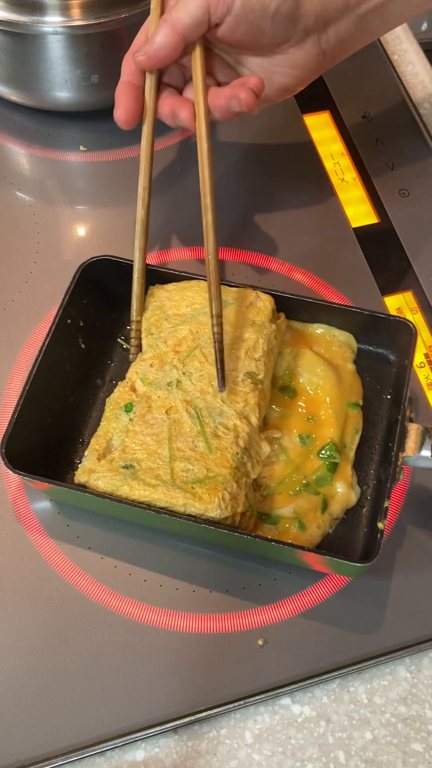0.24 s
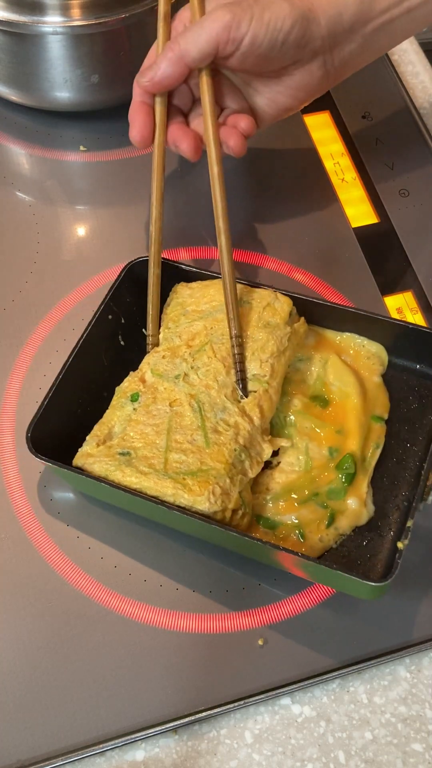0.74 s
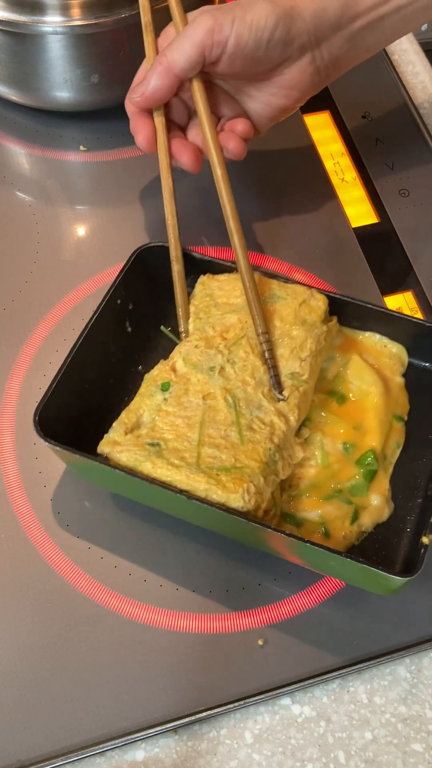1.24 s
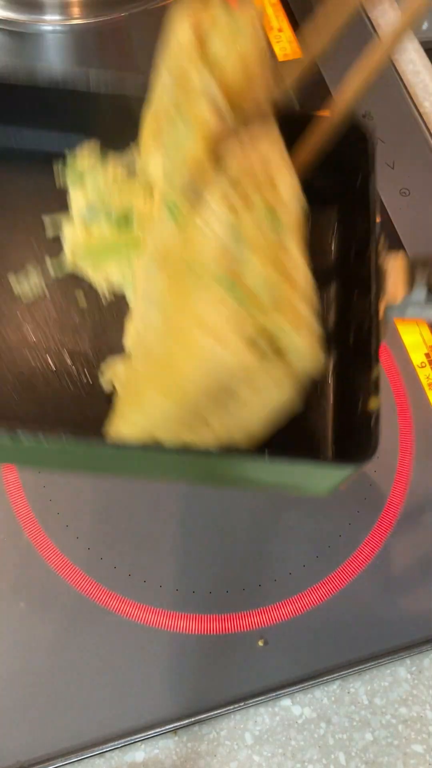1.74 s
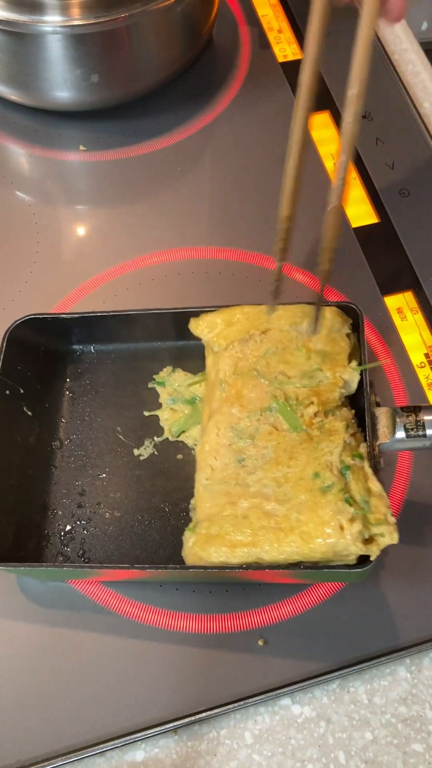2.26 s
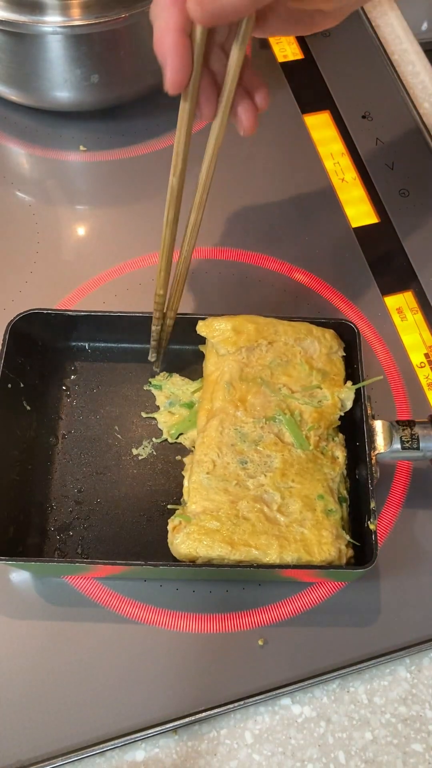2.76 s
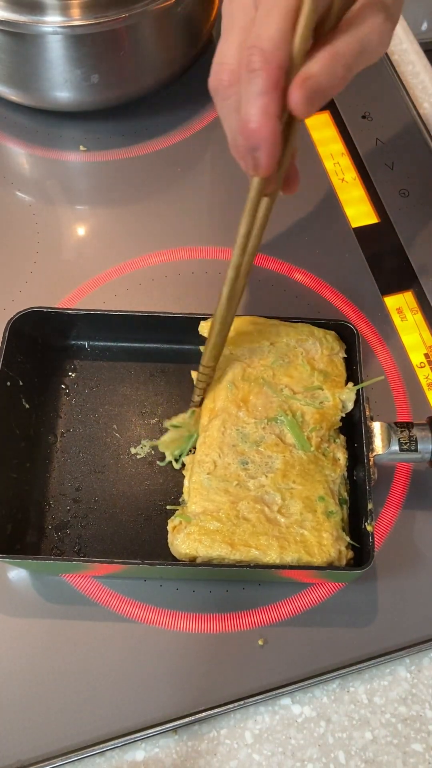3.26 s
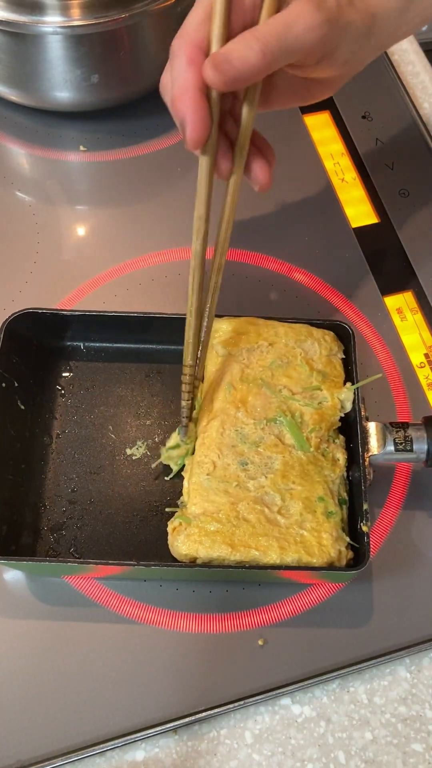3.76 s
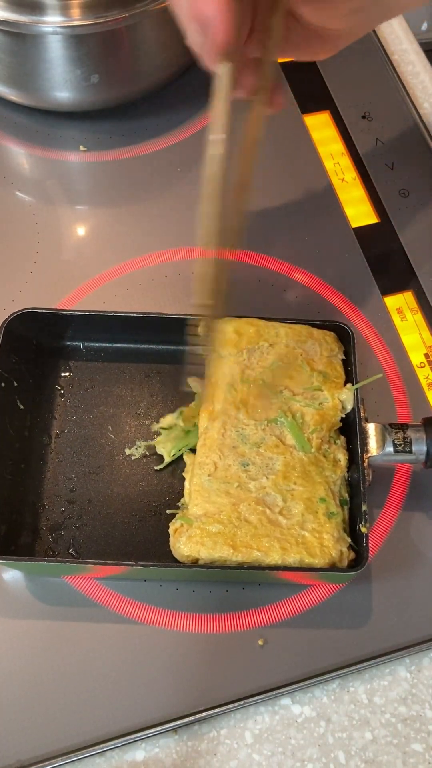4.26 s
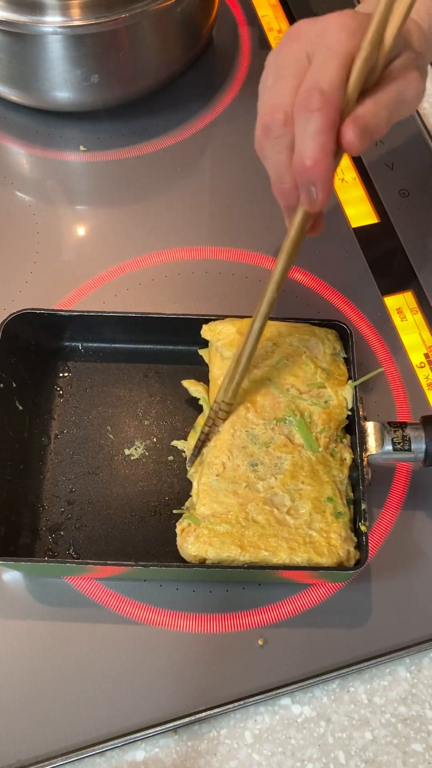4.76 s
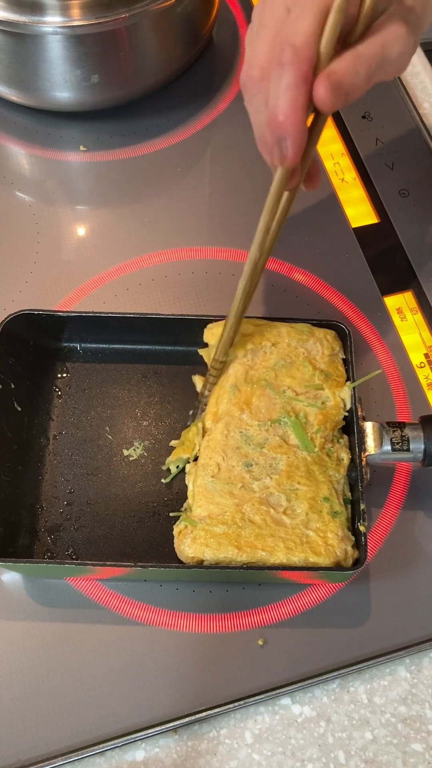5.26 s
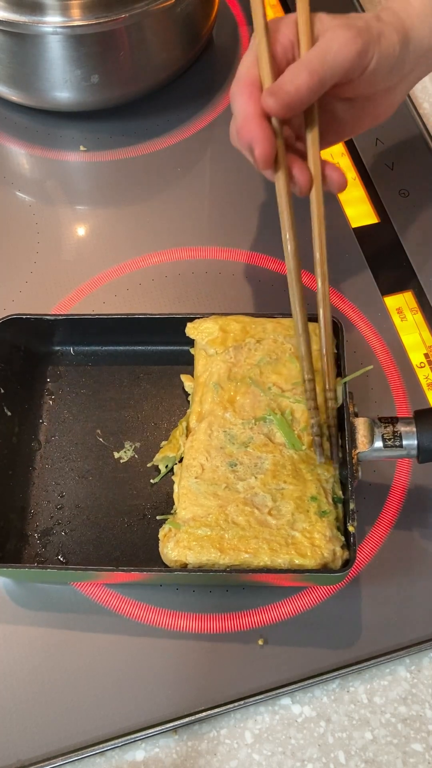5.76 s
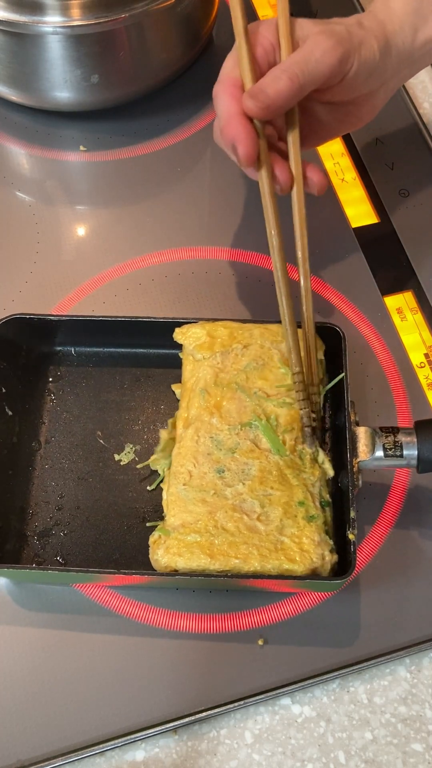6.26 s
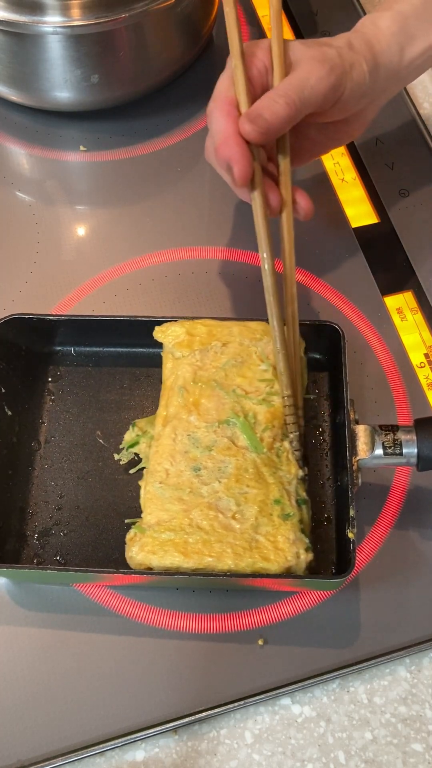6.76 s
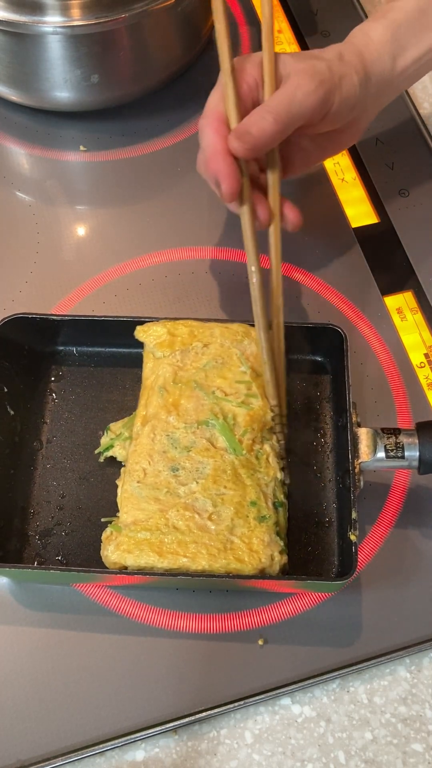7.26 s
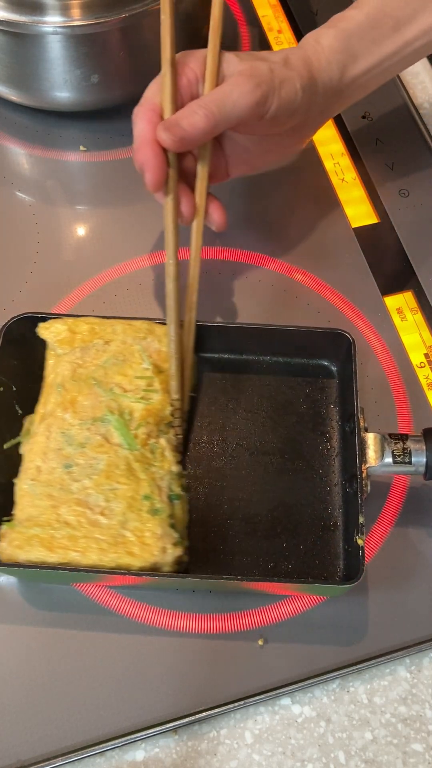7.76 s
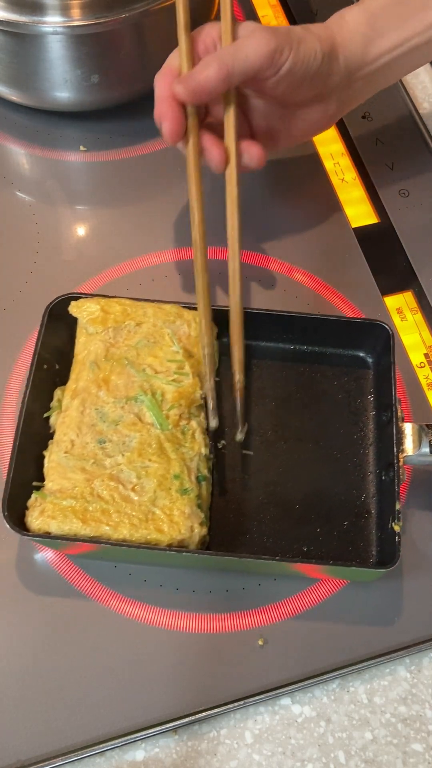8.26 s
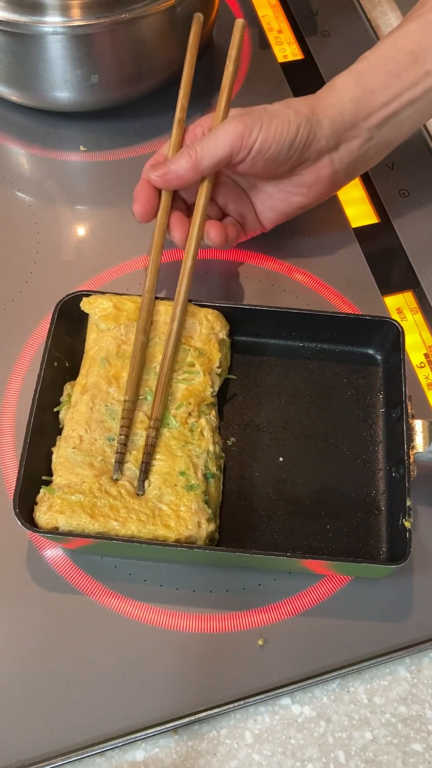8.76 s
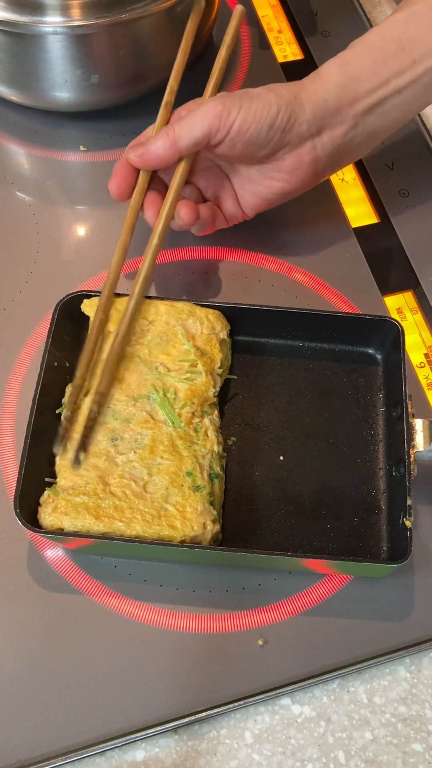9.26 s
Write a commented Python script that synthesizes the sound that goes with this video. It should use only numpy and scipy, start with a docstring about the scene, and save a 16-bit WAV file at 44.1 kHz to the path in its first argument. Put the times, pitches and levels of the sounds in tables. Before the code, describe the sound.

An omelette is rolled on a glass-topped hob, heard from close above in stereo. A steady low fan drone underlies thin frying fizz. Two light knocks come first, then a rustle and one hard clack as the pan is set down, followed by little settling bumps. After a quieter spell, small bamboo taps and sharp spits gather into a scratchy, crackling push, then ease off.

```python
"""In a kitchen, an omelette is rolled with chopsticks in a square pan on a glass-topped induction hob.
Random noise shaped by resonances makes the fan's drone; wavering sine tones make the coil's hum and whines.
Clouds of tiny clicks make the sizzle, and short cracks with pings make the spits of fat and steam.
The pan is tilted, swung up to flip the roll and set down with a clack of fading tones;
then chopsticks push the roll over the hot metal, heard as jerky clicks, crackles and wooden taps."""
import sys
import numpy as np
from scipy import signal
from scipy.fft import rfft, irfft
from scipy.io import wavfile

SR = 44100
rng = np.random.default_rng(int(sys.argv[2]) if len(sys.argv) > 2 else 0)


def master(y):
    """Save y as 16-bit WAV."""
    cut = np.clip(np.atleast_2d(y).T, -1, 1)
    pcm = np.round(cut * 32767)  # scale
    wavfile.write(sys.argv[1], SR, pcm.astype(np.int16))


N = 419391

# air resonances of the hob housing: (centre [Hz], width of one filter pass [Hz], relative level [dB])
HOUSING_RESONANCES = [(71, 29, -14.5), (98.8, 23.7, -3), (117.5, 20.4, -1.5), (133.8, 25.3, -1.5),
                      (167, 36, -17.5), (220.7, 25.5, -10), (244.5, 20.6, -11), (334, 25, -10),
                      (361, 30.6, -12), (430.8, 49, -13), (500, 25, -19), (715, 126, -21.5),
                      (1047, 75, -23.5)]
# colour of the fan's rushing air: (frequency [Hz], relative level per Hz [dB])
AIR_COLOUR = [(20, -10), (150, 8.5), (320, 7.5), (560, 3.5), (900, 2.5), (1400, -2.5), (2200, -2.5),
              (2700, -7.5), (3300, -7), (5000, -28), (16000, -64)]
# loudness of the fan's boom before its random waver: (time [s], level [dB])
DRONE_LEVEL = [(0, -39.5), (1.7, -37), (2.6, -37.5), (3.15, -39.5), (3.75, -37.5), (4.2, -36), (5.5, -36.5),
               (6.1, -37.5), (6.8, -37.5), (8.3, -38), (9.51, -38.5)]
# the fan at the two microphone openings: (frequency [Hz], left minus right [dB], likeness [0-1])
FAN_IMAGE = [(30, 1, 0.9), (70, 2.5, 1), (130, 1.4, 0.99), (235, -0.5, 0.98), (373, 5, 0.98),
             (527, 3.5, 0.54), (720, 3.5, 0.37), (900, 0.5, 0.21), (2200, -3, 0.21), (16000, -13, 0.2)]
# step between the two microphone openings: (frequency [Hz], lead of the left [radians])
PORT_PHASE = [(0, 0), (450, -.1), (1000, -.8), (2150, .8), (3300, .2), (4500, 2.15), (16000, 13.75)]
# whines of the coil: (pitch [Hz], level between the fades [dB], start [s], end [s])
COIL_WHINES = [(2041, -65.5, 4.4, 8.6), (2190, -65.5, 7.2, 9.2)]
# pan raised off the glass: (time [s], length [s], level of the air ringing in the gap [dB])
PAN_LIFTS = [(.3, 0.72, -55.5), (1.597, 0.31, -47)]
# short or longer soft rustles with a flare of frying; the one at 2.165 s swells just before the clack:
# (time [s], length [s], rustle level [dB], relative flare of the frying [dB], rustle centre [Hz])
RUSTLES = [(0.636, 0.1, -55, -42.5, 2000), (1.01, 0.13, -67, -47, 1600), (1.726, 0.17, -54, -45.5, 1600),
           (2.165, 0.045, -33, -41, 1300), (2.413, 1, -52, -73, 2400)]
# ringing tones of the pan on the glass: (pitch [Hz], relative level [dB], free time to fall 60 dB [s])
PAN_MODES = [(131, -12.5, 0.15), (330, -13, 0.045), (437, -6.5, 0.028), (610, -10, 0.024),
             (850, -12, 0.032), (1038, -12.5, 0.05), (1144, -15, 0.07), (1250, 0.5, 0.028),
             (1357, -10, 0.059), (1700, -1.5, 0.02), (1795, 0.5, 0.025), (2370, -4, 0.029),
             (2540, -5, 0.02), (2880, -9.5, 0.05), (3150, -5, 0.021), (3470, -1.5, 0.016),
             (4446, -1, 0.021), (5280, -4.5, 0.011), (6720, -8, .012), (8100, -4.5, 0.0088)]
# knocks of the pan on the glass:
# (time [s], peak level [dB], softness: treble cut-off [Hz], thinness: bass cut-off [Hz],
#  share of the free ring time [ratio], pitch favoured by the struck spot [Hz], size of that favour [dB])
PAN_KNOCKS = [(.7172, -15, 4200, 300, 0.76, 1320, 4), (.7195, -23.5, 700, 200, .7, 420, 4),
              (1.155, -24.5, 5000, 1000, 1.6, 1760, -1), (1.6287, -31, 6000, 800, 0.87, 850, 1),
              (2.1989, 1, 13000, 600, 0.76, 1754, 5), (2.2032, -12, 600, 100, 0.65, 303, 4),
              (2.2216, -4.5, 1900, 500, 0.29, 1170, 7), (2.2256, -15, 450, 110, 0.73, 330, 8),
              (2.4378, -20, 1400, 300, .8, 1030, 11), (2.4422, -20.5, 600, 150, 0.75, 340, 2),
              (2.7227, -20, 2900, 950, 1, 1270, 7), (2.817, -33.5, 2200, 900, 0.67, 1270, 8)]
# ringing tones of bamboo chopsticks: (pitch [Hz], relative level [dB], free time to fall 60 dB [s])
BAMBOO_MODES = [(1400, -10, 0.042), (1619, -7, 0.055), (1890, -6.5, 0.022), (2504, -4, 0.025),
                (3294, -6, 0.025), (3640, -6.5, 0.021), (4300, -7.5, 0.019)]
# chopstick taps:
# (time [s], peak level [dB], softness: treble cut-off [Hz], thinness: bass cut-off [Hz],
#  share of the free ring time [ratio], pitch favoured by the struck spot [Hz], size of that favour [dB])
CHOPSTICK_TAPS = [(3.591, -33, 1900, 800, 0.8, 1500, 4), (4.39, -26, 4000, 800, 0.98, 1630, 4),
                  (4.3935, -28.5, 4500, 1300, 1.3, 2600, 4), (5.0147, -25, 3600, 1200, 0.75, 1630, 5),
                  (5.2167, -26, 9000, 2800, 0.6, 3600, 5), (5.241, -34, 2200, 900, 0.89, 1500, 4),
                  (5.338, -32.5, 6000, 3000, 0.83, 3700, 8), (5.609, -33, 8000, 3200, .6, 4200, 6),
                  (5.849, -32, 4000, 1500, .7, 2290, -1), (6.02, -29.5, 2500, 900, 1.7, 1470, 9),
                  (6.274, -33, 2000, 700, 1, 1400, 4), (6.954, -25.5, 6020, 1700, 0.38, 2430, 5),
                  (6.974, -27, 5000, 1500, 0.46, 2390, 9), (7.0073, -28.5, 4490, 1700, .51, 2450, 5),
                  (7.333, -26, 6000, 2600, 1.4, 3890, 4), (7.4265, -22.5, 4500, 1900, 0.45, 2350, 4),
                  (7.464, -28, 6000, 2200, .6, 3390, 7), (7.518, -26, 4500, 1600, .7, 2140, 2),
                  (7.65, -33, 4000, 1800, .7, 2400, 5), (7.6755, -31, 4500, 1700, 0.52, 2230, 5),
                  (7.7695, -23.5, 6000, 2400, .7, 3500, 8), (8.475, -27, 7000, 2396, .86, 3350, 3)]
# chopsticks push the roll: (time [s], length [s], relative force before the build-up is applied [dB])
PUSHES = [(5.72, 0.46, -59), (6.178, 0.31, -58), (6.564, 0.57, -48), (7.209, 0.53, -43),
          (8.423, 0.089, -53)]
# colour of wet egg rubbing over the pan: (frequency [Hz], relative level per Hz [dB])
RUB_COLOUR = [(400, -22), (1200, -8), (1600, -3), (1900, -11), (2150, 15), (2800, 6), (3600, -1),
              (4400, -7), (5400, -12), (6600, 6), (9000, 7), (16000, -8)]
# colour of the frying egg: (frequency [Hz], relative level per Hz [dB])
FRY_COLOUR = [(300, -47), (1200, 2), (2200, -1), (3600, -3), (5400, 2.5), (7000, 0), (9000, 1.5),
              (11500, -1), (14000, 1), (16000, -4.5)]
# single spits of fat and bursting steam blisters:
# (time [s], relative strength [dB], centre [Hz], droplets against the crack [dB])
SPITS = [(.046, -20.5, 10500, -24), (.283, -39, 9000, -22), (.484, -37, 9000, -22),
         (0.586, -24, 15000, -24), (0.749, -19, 7380, -22), (0.7976, -26, 9020, -22),
         (1.254, -28, 8050, -22), (1.715, -15, 9900, -8), (1.7998, -23, 8870, -20), (2.356, -23, 8320, -10),
         (2.813, -19.5, 8610, -18), (2.8589, -22, 9070, -14), (3.2665, -23, 8760, -20),
         (3.8174, -24, 9100, -20), (3.906, -22.5, 9820, -20), (4.119, -19, 9130, -9),
         (4.5935, -20, 9030, -7), (4.9386, -25, 14600, -22), (4.996, -27, 9500, -24),
         (5.2164, -8, 11500, -28), (5.231, -14.5, 9000, -12), (5.2484, -26, 8600, -24),
         (5.3385, -20, 9630, -14), (5.6082, -20, 8700, -20), (5.7713, -27, 14300, -22),
         (5.8311, -16, 14200, -17), (5.9469, -26, 14400, -20), (5.9805, -12, 10000, -13),
         (6.0172, -8, 13600, -12), (6.432, -25, 14000, -22), (6.475, -23, 9000, -22),
         (6.5181, -18, 9470, -22), (6.618, -17, 13800, -22), (6.8388, -20, 9080, -14),
         (6.9553, -5, 10900, -14), (6.9747, -14, 9400, -20), (6.9799, -12.5, 9200, -18),
         (7.008, -15, 9200, -22), (7.086, -12, 15000, -14), (7.1084, -18, 14400, -20),
         (7.1302, -13, 9460, -10), (7.245, -13.5, 9190, -7), (7.262, -14, 7530, -24),
         (7.3115, -13, 13400, -22), (7.334, -17, 14300, -18), (7.3419, -17, 9400, -16),
         (7.464, -15.5, 8420, -10), (7.514, -15, 10000, -17), (7.528, -12, 9100, -20),
         (7.6402, -9, 12500, -22), (7.659, -23, 9070, -18), (7.7, -14, 9770, -16), (7.777, -14, 8660, -14),
         (7.937, -16, 10300, -6), (7.961, -13, 8860, -7), (8.092, -32, 9000, -20),
         (8.1341, -16.5, 9100, -10), (8.353, -25, 9000, -20), (8.389, -19, 8950, -10),
         (8.455, -19, 9000, -16), (8.489, -18, 9600, -12), (8.80, -18, 8840, -26),
         (8.8133, -20, 13800, -26), (9.152, -24, 8800, -22), (8.4404, -23, 8730, -16),
         (8.4755, -15, 10000, -22), (8.5905, -13, 8750, -6), (8.7336, -22, 8240, -18),
         (8.8103, -8, 14600, -28), (8.9677, -20.5, 10200, -15), (9.259, -12.5, 12500, -20),
         (9.424, -19, 8550, -10)]
# wet egg pressed on to hot metal: (time [s], length [s], relative level [dB])
SQUEEZES = [(5.858, 0.037, -40), (6.017, 0.018, -25.5), (6.042, 0.013, -27), (6.834, 0.015, -34.5),
            (7.335, .012, -28), (7.516, 0.01, -31.5), (7.55, 0.0055, -30), (7.573, 0.018, -39),
            (7.646, 0.013, -40)]

TOP_HZ = 15800  # nearly nothing is heard above this
TIME = np.arange(N) / SR  # seconds
HZ = np.maximum(np.fft.rfftfreq(N, 1 / SR), 1)  # frequencies, kept above zero for the logarithm
HUM_HZ, HUM_DB = 118.4, -50.5  # low hum of the coil
LIFT_ATTACK_S, LIFT_RELEASE_S = 0.12, 1
RUSTLE_ATTACK_S, RUSTLE_RELEASE_S = 0.033, 0.29
SPOT_WIDTH_HZ = 150  # how widely the struck spot favours the tones around its pitch
IN_STEP_HZ = 1500  # tones up to here all start in the same direction
# chatter of touching surfaces, against the ringing tones
PAN_CHATTER_DB, BAMBOO_CHATTER_DB, CHATTER_T60_S = -6, -3, 0.055
PUSH_ATTACK_S, PUSH_RELEASE_S, PUSH_BUILD_DB = 0.12, 0.38, 2.5  # each push gathers force as it goes
# frying flares with a push, but grows more slowly than its force
PUSH_FRY_DB, PUSH_FRY_POWER = -19.5, 0.48
# the egg fries quietly until the tilt lets it run over bare metal, then steadily (relative levels)
WET_S, QUIET_FRY_DB, STEADY_FRY_DB = 0.65, -53, -47.5
# lesser spits at random: average rate, relative strength and its scatter, centre, droplets against crack
SPITS_PER_S, SMALL_SPIT_DB, SMALL_SPIT_SCATTER_DB = 9, -33, 5.5
SMALL_SPIT_HZ, SMALL_DROPLETS_DB = 9200, -13
CRACK_T60_S, DROPLETS_T60_S, PING_T60_S = 0.003, 0.044, 0.0015  # times to fall 60 dB


def undb(db):
    """Turn decibels into a plain multiplier."""
    return 10 ** (np.asarray(db) / 20)


def level(x, db):
    """Set the average (rms) level."""
    return x * undb(db) / np.sqrt(np.mean(x ** 2))


def across(rows, axis=1):
    """Read one column of a table at every frequency."""
    rows = np.array(rows)
    return np.interp(np.log(HZ), np.log(rows[:, 0]), rows[:, axis])


def filtered(x, response):
    """Make each frequency stronger or weaker, as the response says."""
    return irfft(rfft(x) * response, N)


def resonance(hz, width_hz):
    """Response of one resonance, 1 at its centre."""
    return 1 / (1 + 1j * hz / width_hz * (HZ / hz - hz / HZ))


def walk(rate):
    """Wander at random between points, rate of them per second, with a spread near 1."""
    knots = np.arange(0, TIME[-1] + 1, 1 / rate)
    return 1.182 * np.interp(TIME, knots, rng.standard_normal(len(knots)))


def grains(rate, spread_db):
    """Tiny random clicks, rate per second; a wider spread makes a few stand out; rms 1."""
    happens = rng.random(N) < rate / SR
    size = np.minimum(rng.exponential(size=N), 4.8)
    direction = rng.choice([-1, 1], N)
    return level(happens * undb(spread_db * size) * direction, 0)


def ports(direct, diffuse, likeness, pan_db):
    """Direct sound reaches the two microphone openings out of step; diffuse sound differs at each."""
    side = np.array([[.5], [-.5]])
    share = np.clip(likeness, 0, 1)
    phase = side * np.interp(HZ, *np.transpose(PORT_PHASE))
    near = rfft(direct) * np.exp(1j * phase)
    mixed = near * np.sqrt(share) + rfft(diffuse) * np.sqrt(1 - share)
    return irfft(mixed * undb(side * pan_db), N)


def kitchen(x, t60, damp_hz):
    """Dense reflections from hob, wall and pots, different at each opening, with the treble dulled."""
    t = TIME[:SR // 2]
    tail = rng.standard_normal((2, len(t))) * 1000 ** (-t / t60)
    tail *= 1 - np.exp(-t / 0.00013)  # a very quick rise
    tail /= np.sqrt(np.sum(tail ** 2, axis=1, keepdims=True))
    reflected = signal.fftconvolve(x[None], tail, axes=1)[:, :N]
    return filtered(reflected, 1 / (1 + 1j * HZ / damp_hz))


def add(track, s, sound):
    """Lay a sound into a track at time s."""
    start = int(max(s, 0) * SR)
    track[start:start + len(sound)] += sound[:max(N - start, 0)]


def gesture(s, length, attack_s, release_s, build_db=0):
    """One movement: a rise, a hold that may gather force, and a fall of 60 dB in release_s."""
    age = TIME - s
    # the hold builds from 2 * build_db below full force to build_db below it
    hold = undb(build_db * (np.clip(age / length, 0, 1) - 2.0))
    fall = 1000 ** (-np.maximum(age - length, 0) / release_s)
    return np.clip(age / attack_s, 0, 1) * hold * fall


def fan(air_db=-46, waver_db=1.0):
    """Turbulence from the fan booms in the housing and rushes out of the vent."""
    power = sum(abs(undb(db) * resonance(hz, width) ** 2) ** 2 for hz, width, db in HOUSING_RESONANCES)
    boom = level(filtered(rng.standard_normal((3, N)), np.sqrt(power)), 0)
    drone_db = np.interp(TIME, *np.transpose(DRONE_LEVEL)) + waver_db * walk(5.4)
    air = level(filtered(rng.standard_normal((3, N)), undb(across(AIR_COLOUR))), air_db)
    sound = boom * undb(drone_db) + air * undb(.5 * walk(3.22))
    return ports(sound[0], sound[1:], across(FAN_IMAGE, axis=2), across(FAN_IMAGE))


def coil(drift_hz=2.534, waver_db=2.0, fade_s=0.18):
    """The magnetic field shakes the pan: a steady low hum, and thin whines that fade in and out."""
    def tone(hz, db):
        """One line that wavers in pitch and loudness."""
        turns = np.cumsum(hz + drift_hz * walk(9)) / SR
        return level(np.sin(2 * np.pi * turns) * undb(waver_db * walk(3.6)), db)

    out = tone(HUM_HZ, HUM_DB)
    for hz, db, start, end in COIL_WHINES:
        fade = np.clip(np.minimum(TIME - start, end - TIME) / fade_s, 0, 1)
        out = out + tone(hz, db) * fade
    return ports(out, np.zeros((2, N)), 1, across(FAN_IMAGE))


def lifted_pan(uneven_db=3.0, rustle_width_hz=1900):
    """The gap under the raised pan rings hollow; uneven clouds of clicks make soft rustles."""
    raised = sum(undb(db) * gesture(s, length, LIFT_ATTACK_S, LIFT_RELEASE_S)
                 for s, length, db in PAN_LIFTS)
    hollow = filtered(rng.standard_normal((3, N)), resonance(hz=1250, width_hz=850) ** 2)
    sound = level(hollow, 0) * raised
    clicks = np.array([grains(rate=2000, spread_db=0.5) for _ in range(3)])
    uneven = clicks * undb(uneven_db * walk(42))
    for s, length, db, _, hz in RUSTLES:
        band = signal.iirpeak(hz, hz / rustle_width_hz, fs=SR)
        rustle = signal.lfilter(*band, signal.lfilter(*band, uneven))
        sound = sound + level(rustle, db) * gesture(s, length, RUSTLE_ATTACK_S, RUSTLE_RELEASE_S)
    return ports(sound[0], sound[1:], likeness=0.39, pan_db=-4.0)


def strike(blows, modes, chatter_db):
    """Blows ring tones coloured by the struck spot; soft contacts lose treble, light ones bass."""
    out, t = np.zeros(N), TIME[:SR // 5]
    for s, db, soft_hz, thin_hz, free, spot_hz, spot_db in blows:
        detune = 1 + 0.0074 * rng.standard_normal(len(modes))
        ring = np.zeros(len(t))
        for k, (hz, gain_db, t60) in enumerate(modes):
            favour_db = spot_db * np.exp(-((hz - spot_hz) / SPOT_WIDTH_HZ) ** 2)
            # higher tones start in alternate directions
            direction = (-1) ** (k * (hz > IN_STEP_HZ))
            tone = np.sin(2 * np.pi * hz * detune[k] * t) * 1000 ** (-t / (t60 * free))
            ring += direction * undb(gain_db + favour_db) * tone
        # the surfaces chatter against each other for a moment
        chatter = rng.standard_normal(len(t)) * 1000 ** (-t / (CHATTER_T60_S * free))
        ring = ring + undb(chatter_db) * chatter
        ring = signal.lfilter(*signal.butter(2, min(soft_hz, SR / 2 - 2000), fs=SR), ring)
        ring = signal.lfilter(*signal.butter(2, min(thin_hz, SR / 2 - 2000), "high", fs=SR), ring)
        add(out, s, ring * undb(db) / abs(ring).max())
    return out


def knocks():
    """The pan clacks on the glass; the chopsticks tap the pan and each other."""
    pan = strike(PAN_KNOCKS, PAN_MODES, PAN_CHATTER_DB)
    sound = pan + strike(CHOPSTICK_TAPS, BAMBOO_MODES, BAMBOO_CHATTER_DB)
    return ports(sound, kitchen(sound, t60=0.16, damp_hz=7000), likeness=0.8, pan_db=-2.0)


def pushing():
    """Force with which the roll is pushed along."""
    return sum(undb(db) * gesture(s, length, PUSH_ATTACK_S, PUSH_RELEASE_S, PUSH_BUILD_DB)
               for s, length, db in PUSHES)


def slide(jerk_db=4.5, woody_db=-5, woody_width_hz=400):
    """The pushed roll sticks and slips over the pan, with a dense, woody grain of friction."""
    clicks = np.array([grains(rate=400, spread_db=2.5) for _ in range(3)])
    slips = level(filtered(clicks, undb(across(RUB_COLOUR))), 0)
    wood = sum(undb(db) * resonance(hz, woody_width_hz) for hz, db, _ in BAMBOO_MODES)
    woody_grain = level(filtered(grains(rate=160, spread_db=2.5), wood), woody_db)
    sound = (slips * undb(jerk_db * walk(70)) + woody_grain) * pushing()
    return ports(sound[0], sound[1:], likeness=0.59, pan_db=-2.5)


def tearing(tear_db=-3, burst_db=6, burst_per_s=38):
    """The sliding roll peels off the metal in patches; wet patches flash into bursts of crackles."""
    bursts = undb(burst_db * np.clip(walk(burst_per_s), -2, 1.5))
    crackles = grains(rate=2000, spread_db=5.0) * bursts
    sound = level(filtered(crackles, undb(across(FRY_COLOUR))), tear_db) * pushing()
    return ports(sound, kitchen(sound, t60=0.04, damp_hz=18000), likeness=0.88, pan_db=0)


def rustle_flare():
    """Flare of the frying along with each rustle."""
    return sum(undb(db) * gesture(s, length, RUSTLE_ATTACK_S, RUSTLE_RELEASE_S)
               for s, length, _, db, _ in RUSTLES)


def frying():
    """How hard the egg fries: a base level, and harder with each rustle and each push."""
    base_db = np.interp(TIME, [WET_S, WET_S + RUSTLE_ATTACK_S], [QUIET_FRY_DB, STEADY_FRY_DB])
    pushed = undb(PUSH_FRY_DB) * pushing() ** PUSH_FRY_POWER
    return np.sqrt(undb(base_db) ** 2 + rustle_flare() ** 2 + pushed ** 2)


def sizzle(fry_db=4, crackle_db=-4, flicker_db=1.53):
    """Countless steam bubbles burst under the egg: a fine fizz with sparser, brighter crackles."""
    bright = filtered(grains(rate=220, spread_db=4.0), resonance(hz=11300, width_hz=14000))
    bubbles = grains(rate=9000, spread_db=0.0) + level(bright, crackle_db)
    fizz = level(filtered(bubbles, undb(across(FRY_COLOUR))), fry_db)
    sound = fizz * frying() * undb(flicker_db * walk(25))
    return ports(sound, kitchen(sound, t60=0.0041, damp_hz=24700), likeness=0.97, pan_db=0.5)


def small_spits():
    """Lesser spits at random moments, as rows like those of SPITS."""
    slots = np.arange(WET_S, TIME[-1], 1 / SPITS_PER_S)
    chance = rng.uniform(-1.6, 1, (len(slots), 2))
    rows = []
    for s, (late, size) in zip(slots, chance):
        strength_db = SMALL_SPIT_DB + SMALL_SPIT_SCATTER_DB * size
        rows.append((s + abs(late) / SPITS_PER_S, strength_db, SMALL_SPIT_HZ, SMALL_DROPLETS_DB))
    return rows


def spits(spit_db=8, squeeze_db=3.5, snap_db=4.5, ping_db=3):
    """Single blisters snap and ping; wet egg pressed on to the metal by chopsticks hisses briefly."""
    out, t = np.zeros(N), TIME[:SR // 16]
    for s, db, hz, droplets_db in SPITS + small_spits():
        # the skin breaks with a crack, then droplets scatter
        fall = 1000 ** (-t / CRACK_T60_S) + undb(droplets_db) * 1000 ** (-t / DROPLETS_T60_S)
        snap = rng.standard_normal(len(t)) * fall
        snap[0] = undb(snap_db)
        snap = signal.lfilter(*signal.iirpeak(min(hz, TOP_HZ), .9, fs=SR), snap)
        # the opened pocket of steam pings for a few cycles
        snap = snap + undb(ping_db) * np.sin(2 * np.pi * hz * t) * 1000 ** (-t / PING_T60_S)
        # each spit starts 0.49 ms after its listed time
        add(out, s + 0.00049, snap * undb(db + spit_db) / np.sqrt(np.sum(snap ** 2)))
    fizz = grains(rate=2300, spread_db=4.5)
    for s, length, db in SQUEEZES:
        rise = np.clip((TIME - s) / 0.0026, 0, 1)
        fall = 1000 ** (-np.maximum(TIME - s - length, 0) / 0.0065)
        out += fizz * rise * fall * undb(db + squeeze_db)
    sound = filtered(out, undb(across(FRY_COLOUR)) * resonance(hz=14500, width_hz=34000))
    return ports(sound, kitchen(sound, t60=0.051, damp_hz=18000), likeness=0.82, pan_db=-1.5)


def scene():
    """Hob, pan, chopsticks and egg together."""
    hob = fan() + coil()
    pan = lifted_pan() + knocks()
    egg = slide() + tearing() + sizzle() + spits()
    return hob + pan + egg


def record(dry):
    """A steep filter cuts the very top of the treble."""
    return signal.sosfilt(signal.ellip(10, .2, 70, TOP_HZ, fs=SR, output="sos"), dry)


dry = scene()
out = record(dry)
master(out)
```